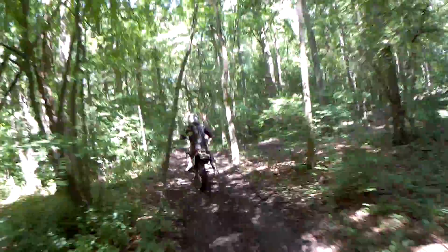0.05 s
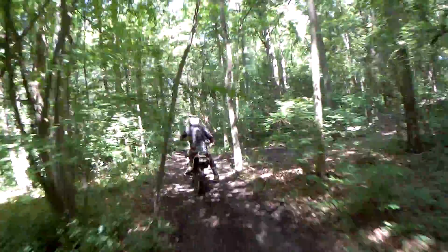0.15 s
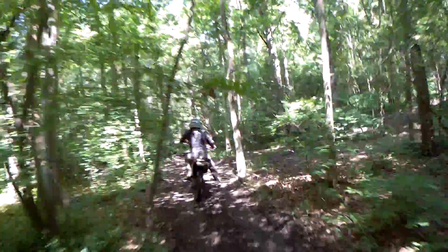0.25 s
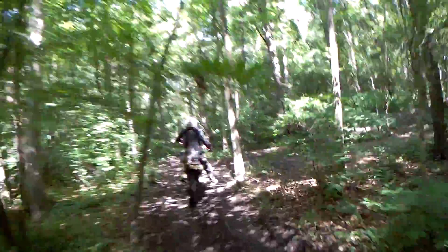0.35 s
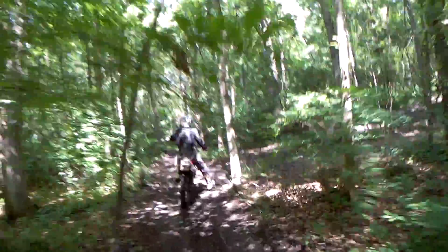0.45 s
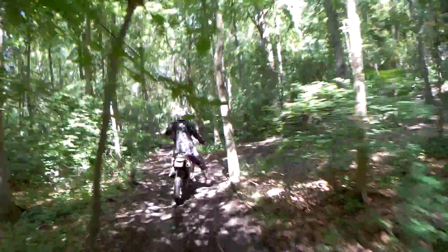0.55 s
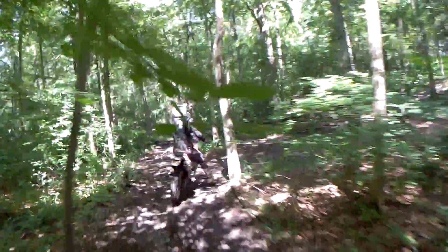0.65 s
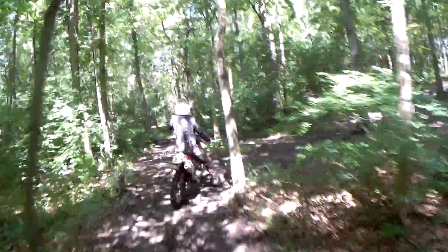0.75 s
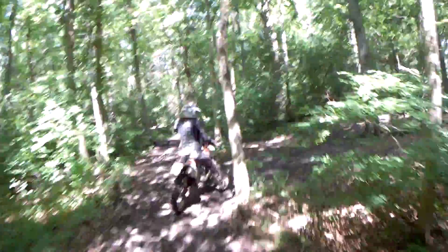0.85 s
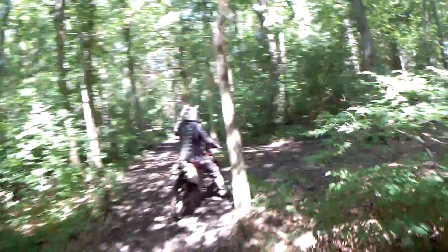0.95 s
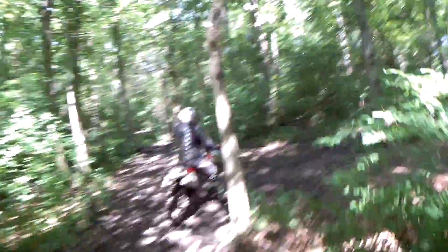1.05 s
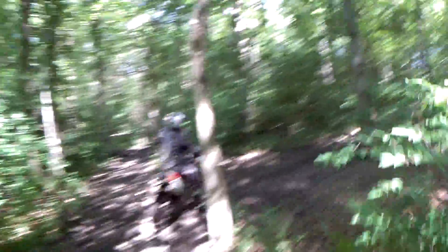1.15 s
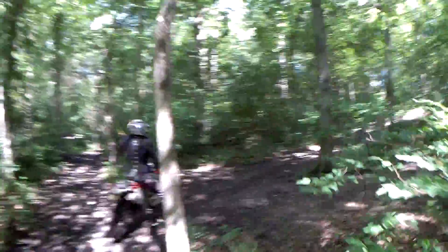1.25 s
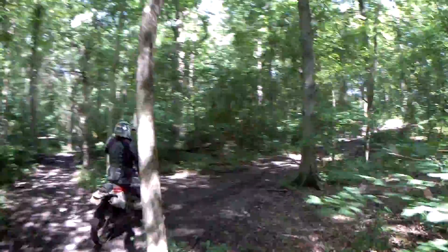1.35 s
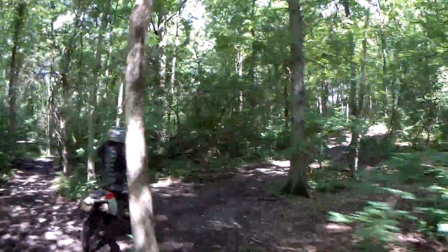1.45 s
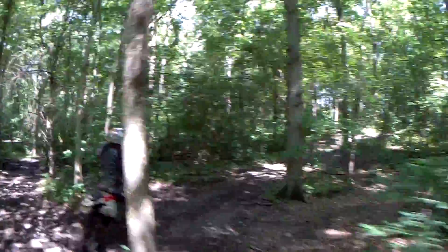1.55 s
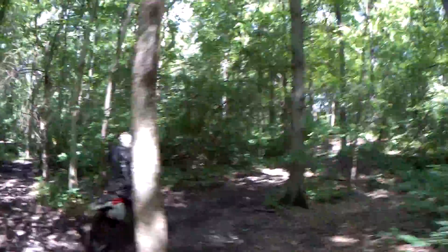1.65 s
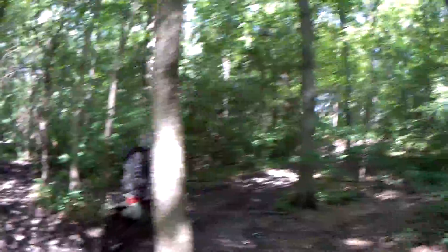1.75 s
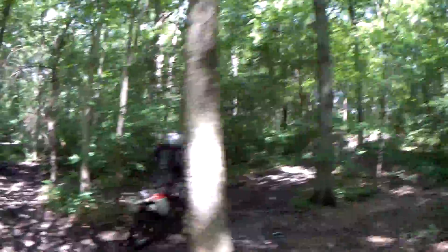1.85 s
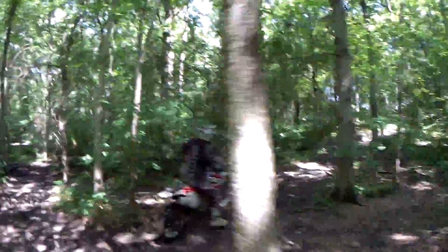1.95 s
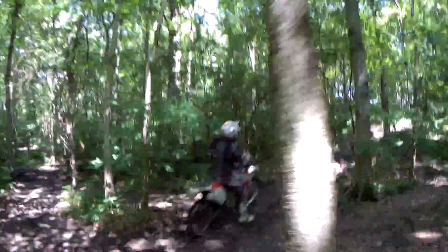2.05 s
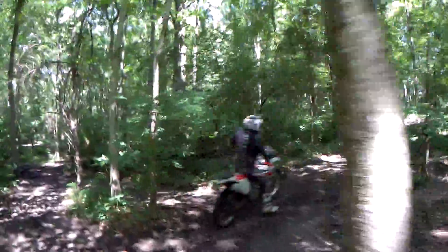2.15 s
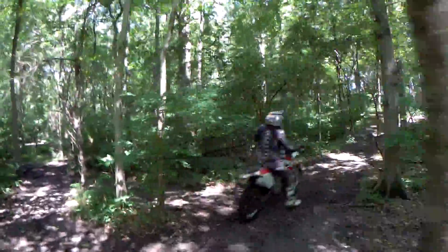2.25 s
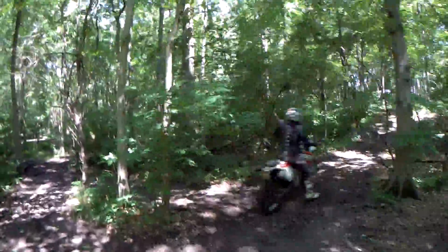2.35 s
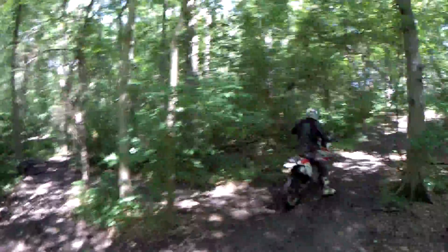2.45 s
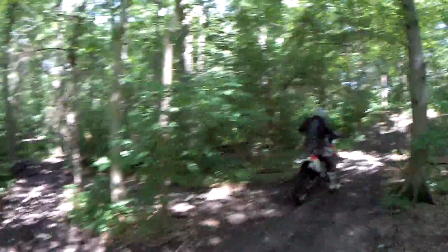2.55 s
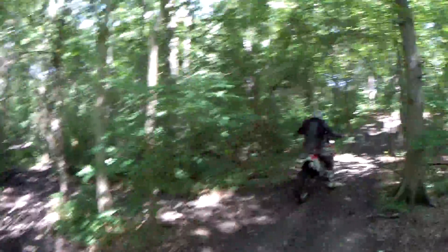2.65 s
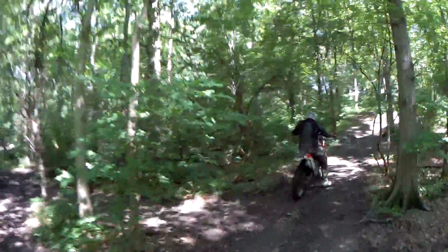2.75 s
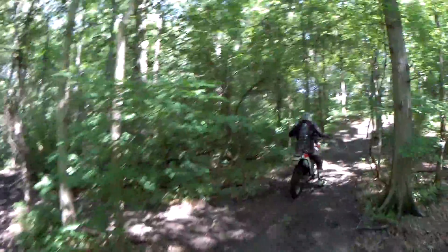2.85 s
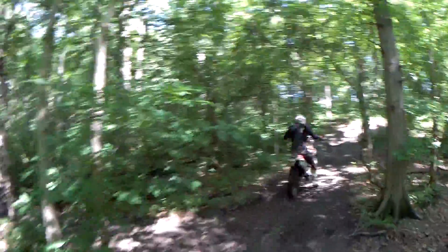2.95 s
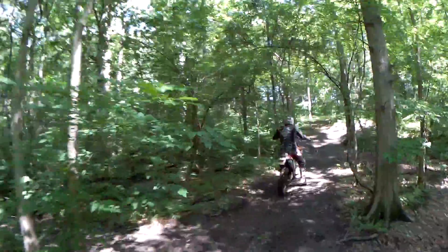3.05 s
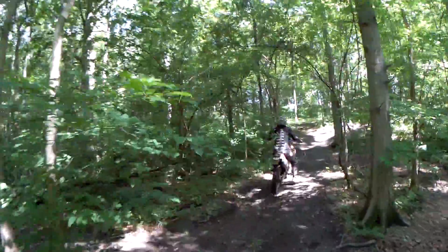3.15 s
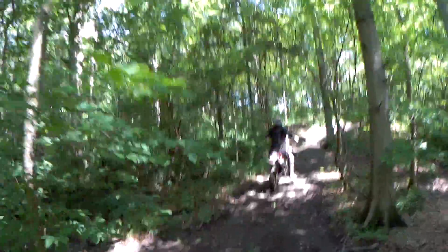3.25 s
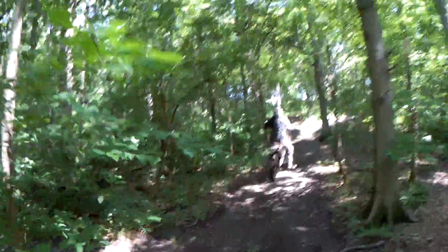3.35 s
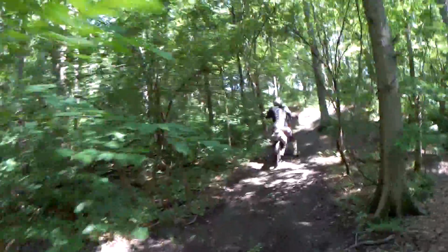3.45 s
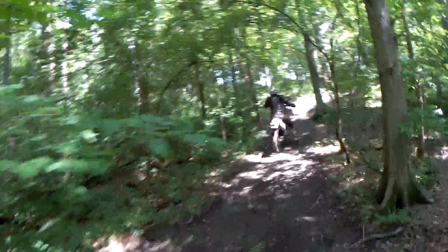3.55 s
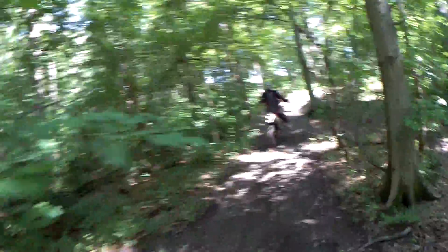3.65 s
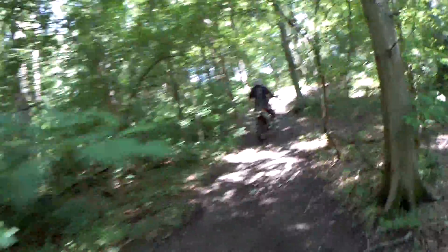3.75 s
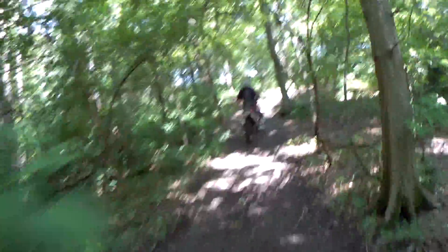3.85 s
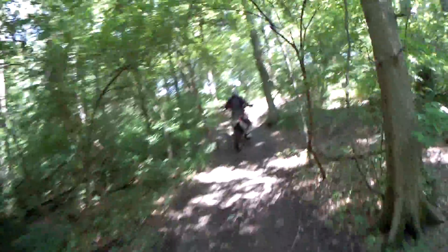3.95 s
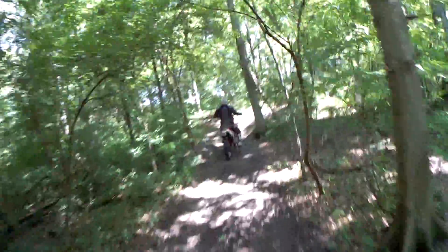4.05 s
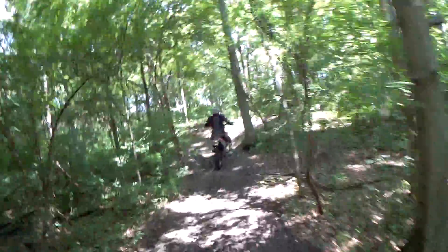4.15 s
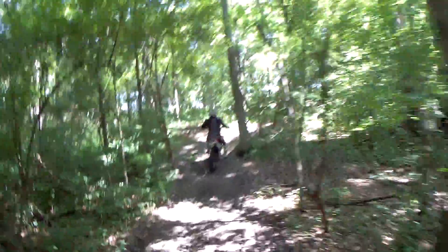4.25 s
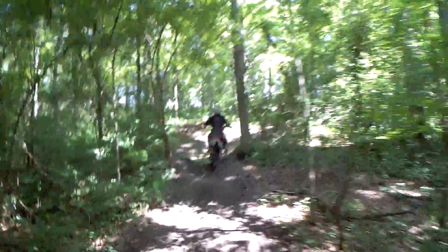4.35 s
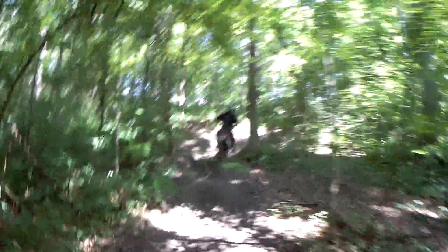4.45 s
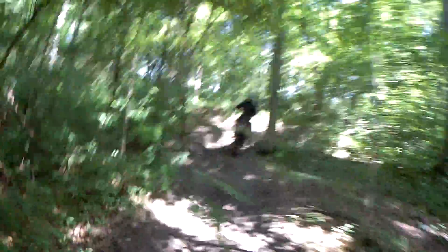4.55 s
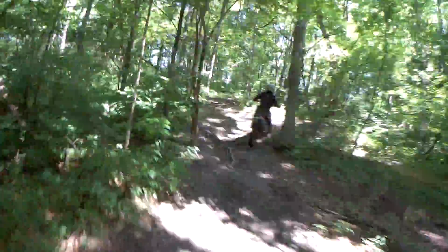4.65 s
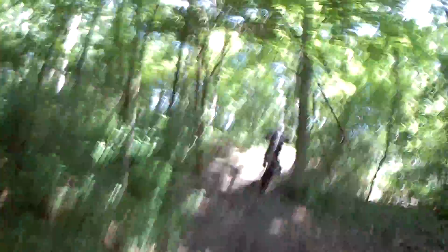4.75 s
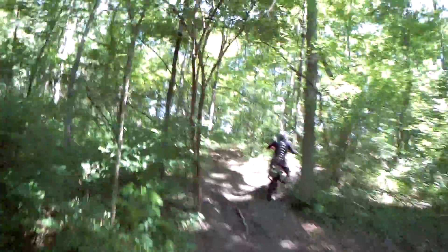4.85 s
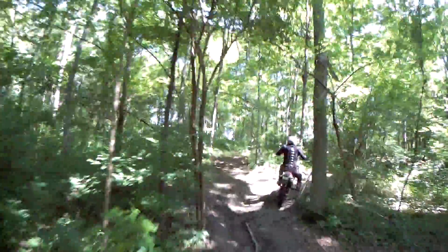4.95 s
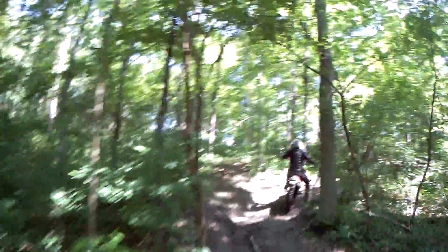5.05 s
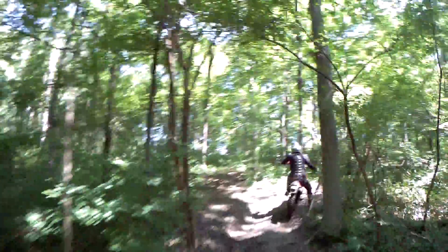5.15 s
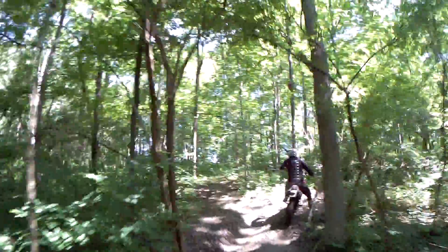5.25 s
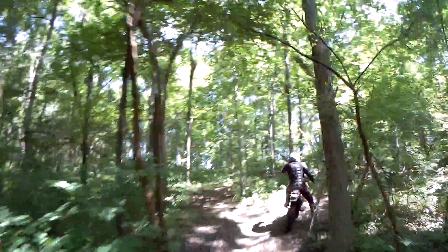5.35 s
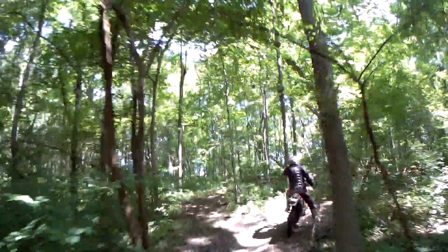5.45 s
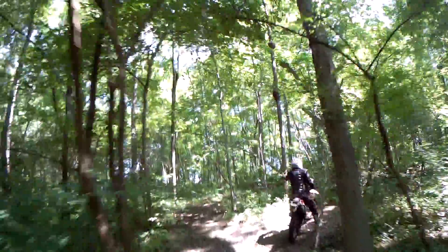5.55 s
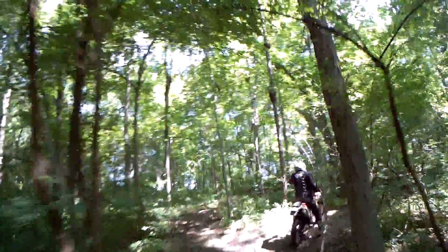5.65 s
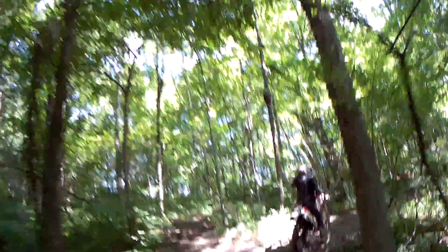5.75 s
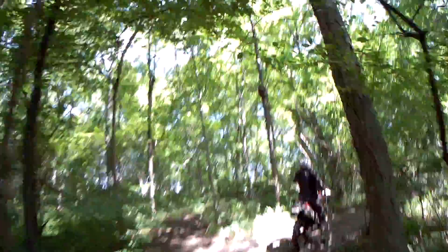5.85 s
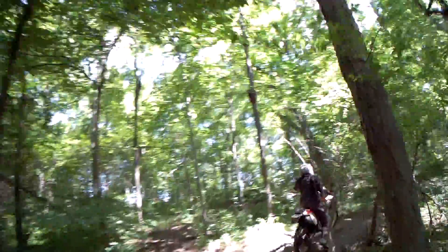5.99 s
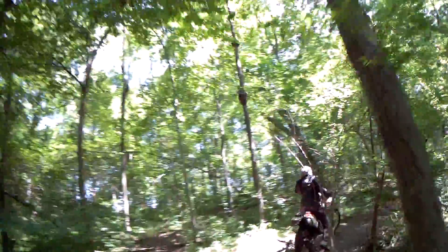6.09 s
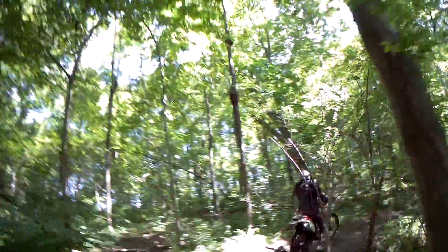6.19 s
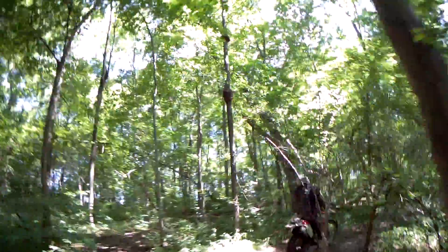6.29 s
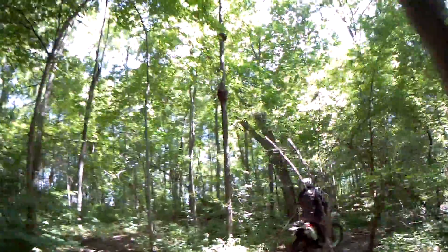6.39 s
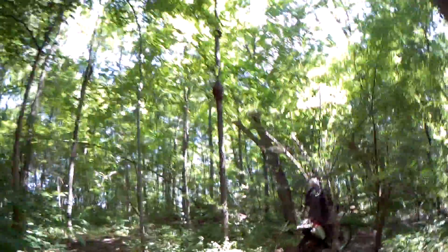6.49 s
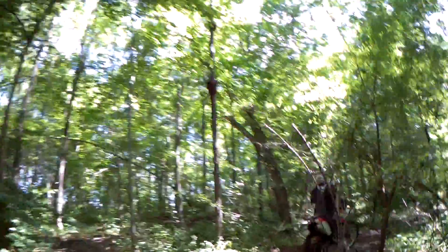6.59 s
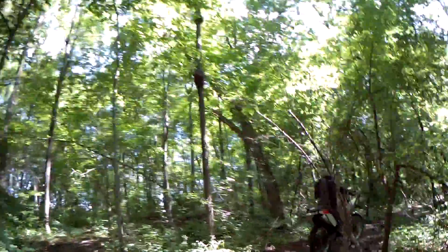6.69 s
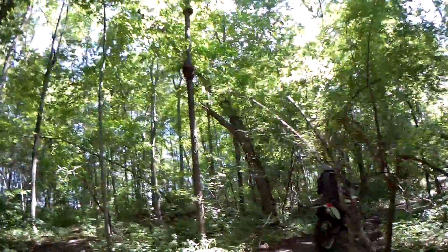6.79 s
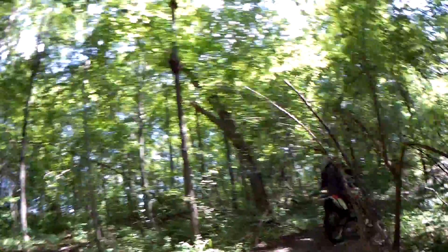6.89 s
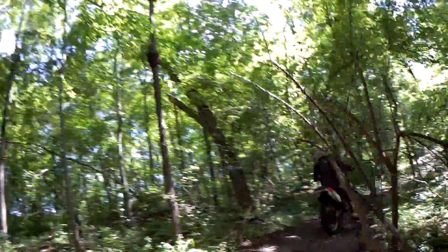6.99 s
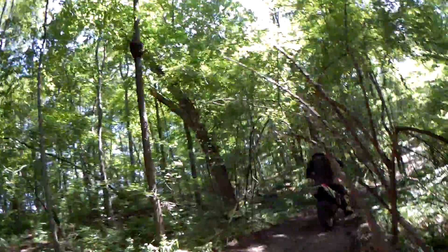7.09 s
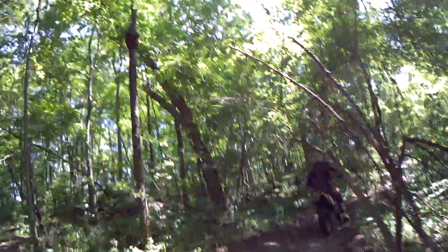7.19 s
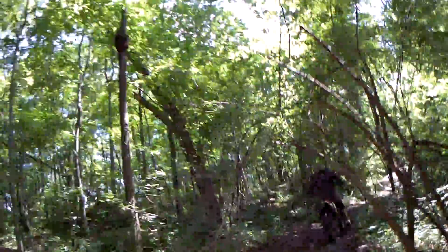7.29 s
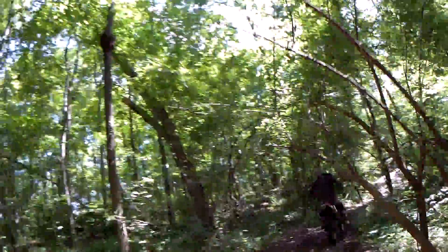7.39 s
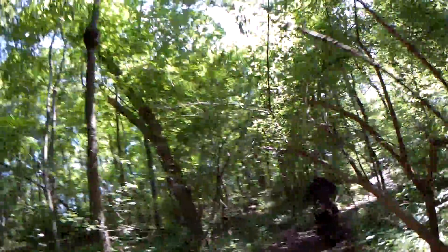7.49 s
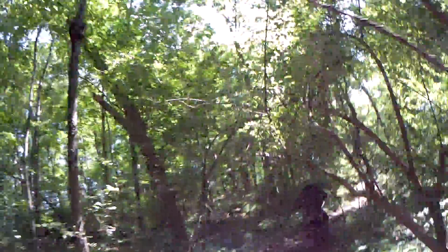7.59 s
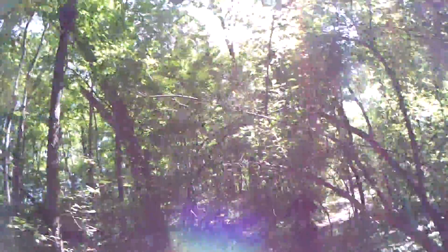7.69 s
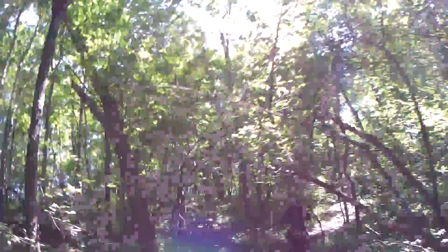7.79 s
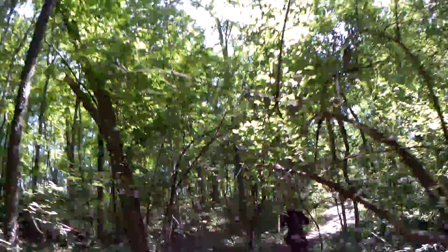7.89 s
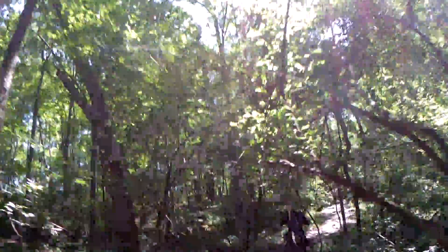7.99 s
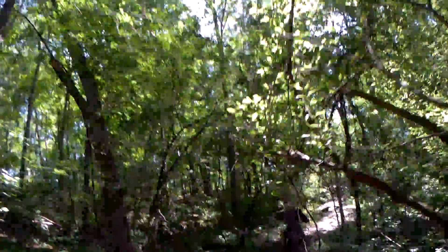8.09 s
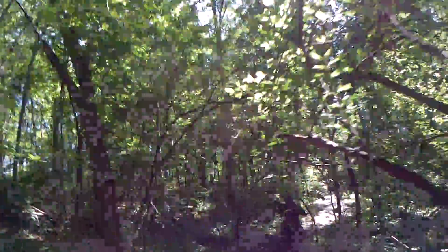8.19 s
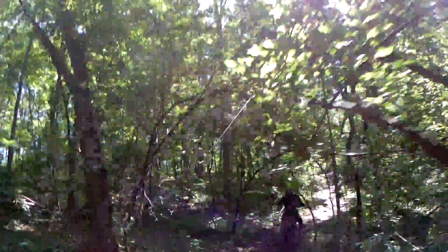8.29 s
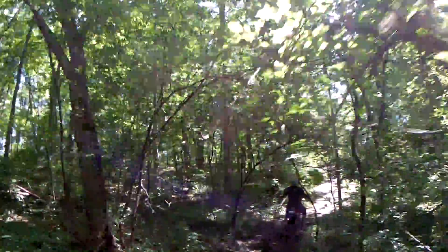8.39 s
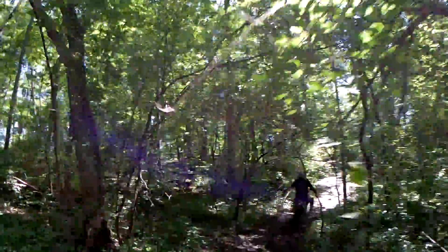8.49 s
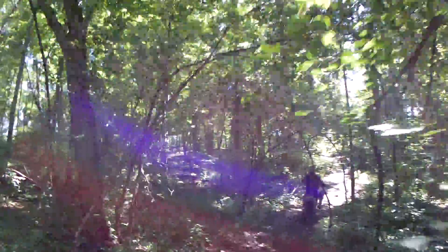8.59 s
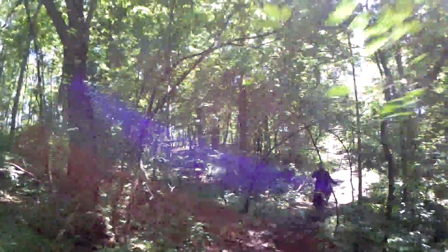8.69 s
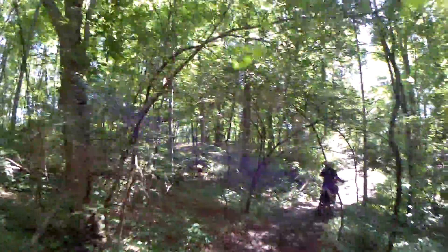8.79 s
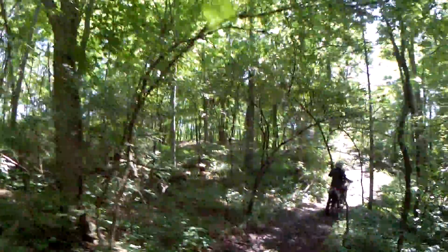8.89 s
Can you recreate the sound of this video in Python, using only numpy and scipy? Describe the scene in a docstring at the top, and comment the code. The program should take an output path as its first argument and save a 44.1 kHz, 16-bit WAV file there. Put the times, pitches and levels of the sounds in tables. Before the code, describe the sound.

Two single-cylinder dirt bikes rev in overlapping turns on a woodland trail, with rattling clatter, branch lashes and hard bumps against a helmet microphone.

```python
"""A woodland trail, heard by a small microphone shut in a case on the helmet of a dirt-bike rider.
The rider's single-cylinder engine and one ahead rev in turns that overlap: pulses ring their exhaust pipes.
Between revs the rider's engine ticks over. Clatter rings the case near 1.2 kHz, over a drone and lumpy wind.
Branches whip the case as bursts of noise and overload the input; bumps strike low tones in the mount."""
import sys
import numpy as np
from scipy import signal
from scipy.fft import rfft, irfft, next_fast_len
from scipy.io import wavfile

SR = 44100
rng = np.random.default_rng(int(sys.argv[2]) if len(sys.argv) > 2 else 0)


def wrap_up_sound(samples):
    """Save the sound to the file named by the first command line argument, as 16-bit audio."""
    columns = np.atleast_2d(samples).T
    # keep every value between -1 and 1, then stretch to whole-number steps
    tamed = np.clip(columns, -1, 1)
    steps = np.round(tamed * 32767).astype(np.int16)
    wavfile.write(sys.argv[1], SR, steps)


def boost(x):
    """Linear amplitude factor 10**(x/20) for a level x in decibels (scalar or array-like)."""
    u = np.asarray(x, float) / 20
    return 10 ** u


N = 393813  # length [samples]


def rms_one(x):
    """Scale a sound to an rms of one."""
    return x / np.sqrt(np.mean(x ** 2) + 1e-20)


def in_time(rows):
    """Join the points of a table with straight lines: one value a sample for each column."""
    s, *columns = np.transpose(rows)
    return [np.interp(np.arange(N) / SR, s, column) for column in columns]


def drift(rate_hz):
    """Slow random wander of spread 1: noise smoothed above rate_hz, made at every 40th sample."""
    r = np.exp(-2 * np.pi * rate_hz * 40 / SR)
    noise = rng.standard_normal(N // 40 + 2002)
    slow = signal.lfilter([1], [1, -2 * r, r * r], noise)[2000:]  # drop the filter's start
    return np.interp(np.arange(N) / 40, np.arange(len(slow)), rms_one(slow))


def resonator(hz, width_hz):
    """Filter coefficients of one resonance: a narrower one rings longer."""
    r = np.exp(-np.pi * width_hz / SR)
    return [(1 - r * r) / 2, 0, (r * r - 1) / 2], [1, -2 * r * np.cos(2 * np.pi * hz / SR), r * r]


def resonate(x, modes):
    """Resonances side by side, added with alternating signs."""
    out = 0
    for k, (hz, width_hz, db) in enumerate(modes):
        b, a = resonator(hz, width_hz)
        out = out + (-1) ** k * boost(db) * signal.lfilter(b, a, x + 1e-18)
    return out


def glide(x, hz, width_hz):
    """A resonance whose centre moves, stepped in short blocks."""
    out, state = np.zeros(N), np.zeros(2)
    for i in range(0, N, 256):
        b, a = resonator(hz[i], width_hz)
        out[i:i + 256], state = signal.lfilter(b, a, x[i:i + 256], zi=state)
    return out


def low_pass(x, hz):
    """Two-pole low-pass: softens what lies above hz."""
    return signal.sosfilt(signal.butter(2, hz, fs=SR, output="sos"), x)


def smear(x, lags_s, gain):
    """All-pass echoes in silencer and frame spread each pulse over its cycle."""
    size = next_fast_len(N + SR // 2)
    spectrum, hz = rfft(x, size), np.arange(size // 2 + 1) * SR / size
    for lag in lags_s:
        z = np.exp(-2j * np.pi * hz * lag)
        spectrum = spectrum * (z - gain) / (1 - gain * z)
    return irfft(spectrum, size)[:N]


def count_cycles(firing_hz, bursts, fires_at, jitter):
    """Add up the firing rate into a slightly uneven cycle count; each firing is a whole number."""
    cycles = np.cumsum(firing_hz) / SR + jitter * drift(10)
    # shift each burst so that one firing falls at its given time
    lead = -cycles[(np.array(fires_at) * SR).astype(int)] % 1 + np.arange(len(bursts))
    burst_ends = [burst[-1][0] + .3 for burst in bursts[:-1]]
    return cycles + lead[np.searchsorted(burst_ends, np.arange(N) / SR)]


def exhaust(pulses, firing_hz, pipe, header, boom, bark):
    """Pulses ring fixed pipe resonances, and a header and a boom that rise with engine speed."""
    spread = smear(pulses, [.0011, .0029], gain=.4)
    base_hz, climb, top_hz, boom_width, boom_db = boom
    keep = np.exp(-1 / (.1 * SR))  # the gas cools over about 0.1 s, so the boom sinks later than the speed
    lagging = signal.lfilter([1 - keep], [1, -keep], firing_hz)
    # hotter, faster gas lifts the main boom
    boom_hz = np.minimum(base_hz + climb * np.maximum(firing_hz, lagging), top_hz)
    # two coupled chambers: the boom swells and outlasts the cycle
    first_chamber = glide(smear(pulses, [.0071, .0127], gain=.5), boom_hz, boom_width)
    boom_ring = glide(first_chamber, boom_hz, boom_width)
    header_base, header_climb, header_width, header_db = header
    header_ring = boost(header_db) * glide(spread, header_base + header_climb * firing_hz, header_width)
    db_per_hz, even_hz = bark
    upper = (resonate(spread, pipe) - header_ring) * boost(db_per_hz * (firing_hz - even_hz))
    return rms_one(upper - boost(boom_db) * boom_ring)


def engine(speeds, bursts, pipe, header, boom, bark, fires_at, jitter, uneven_db):
    """One pressure pulse a firing into the exhaust; also a dying puff a firing, the level and cycle count."""
    firing_hz, = in_time(np.vstack(speeds))
    level_db, = in_time(np.vstack(bursts))
    t = np.arange(N) / SR
    # each burst fades in over 0.15 s before its first point and out over 0.15 s after its last
    on = sum(np.clip(np.minimum(t - b[0][0], b[-1][0] - t) / .15 + 1, 0, 1) for b in bursts)
    level = on * boost(level_db)
    cycles = count_cycles(firing_hz, bursts, fires_at, jitter)
    fired = np.diff(np.floor(np.maximum.accumulate(cycles)), prepend=N) > 0
    strength = boost(uneven_db * rng.standard_normal(N)) * np.sqrt(SR / firing_hz)  # same power at any speed
    pulses = low_pass(fired * strength, 1500)
    tone = exhaust(pulses, firing_hz, pipe, header, boom, bark)
    r = np.exp(-1 / (.012 * SR))  # a puff dies away with a 12 ms time constant
    puff = signal.lfilter([1], [1, -r], fired * boost(1.0 * rng.standard_normal(N)))
    puff *= np.minimum(25 / firing_hz, 1.5) ** 2.2  # slow strokes throb harder
    return tone * level, puff, level, cycles


# The rider's engine speed, one list a burst of throttle: (time [s], firing rate [Hz])
OWN_SPEED = [
    [(0, 30.4), (.3, 26.2), (.5, 21.5)],
    [(3.3, 16.4), (3.52, 28.6), (3.62, 31.8), (3.73, 30), (3.81, 23.9), (4.02, 20.5), (4.14, 23),
     (4.37, 28.1), (4.52, 26.9), (4.72, 30)],
    [(6.6, 18.6), (6.75, 22.9), (6.96, 25.8), (7.25, 31.4), (7.43, 32.9), (7.65, 34.2), (7.9, 34.1),
     (8.24, 33.1), (8.58, 34.1), (8.85, 33.8)],
]
# Its exhaust level in each burst: (time [s], level [dB])
OWN_LEVEL = [
    [(0, -24.5), (.3, -25.5), (.38, -75), (.5, -33)],
    [(3.3, -33.5), (3.46, -25), (3.75, -21), (3.9, -24), (4.38, -21.5), (4.52, -23), (4.72, -23.5)],
    [(6.6, -30), (6.9, -26.5), (7.25, -22.5), (7.5, -26), (8.2, -24.5), (8.85, -23.5)],
]
# Its exhaust resonances as they reach the microphone: (centre [Hz], width [Hz], level [dB])
OWN_PIPE = [(161, 47, -2.5), (237, 13, -0.5), (487, 14.7, 5.5), (495, 31, -0.5), (639.5, 28, -3),
            (749, 38, -8), (863, 40, -11.5), (1080, 37, -16), (1270, 90, -22)]
# Header resonance that slides up with speed: (base [Hz], rise [Hz per firing Hz], width [Hz], level [dB])
OWN_HEADER = (60, 14.3, 60, -2)
# Main boom of the pipe: (base [Hz], rise [Hz per firing Hz], highest [Hz], width [Hz], level [dB])
OWN_BOOM = (128, 6.5, 322, 36, 7)
# Upper resonances grow with speed: (growth [dB per firing Hz], firing rate where the change is none [Hz])
OWN_BARK = (0.026, 96)
# Time of one firing in each burst: (time [s])
OWN_FIRES = [.058, 4.161, 7.537]


def own_engine():
    """The rider's own engine under throttle: fairly even pulses ring its pipe."""
    return engine(OWN_SPEED, OWN_LEVEL, OWN_PIPE, OWN_HEADER, OWN_BOOM, OWN_BARK,
                  fires_at=OWN_FIRES, jitter=.002, uneven_db=.8)


# Tones locked to the rider's engine: (multiple of the firing rate)
WHINE_ORDERS = [2, 22, 32, 33, 35, 36, 38, 46, 47]
# Their strengths before the growth with speed: (level against the exhaust [dB])
WHINE_DB = [-12, -14, -10, -8, -4, -1, -10, -14, -13]


def whine(cycles, level):
    """Crank beat and gear whine of the rider's engine: sine tones that grow steeply with speed."""
    firing_hz, = in_time(np.vstack(OWN_SPEED))
    tones = sum(boost(db) * np.sin(2 * np.pi * k * cycles) for k, db in zip(WHINE_ORDERS, WHINE_DB))
    growth_db = np.minimum(2.0 * (firing_hz - 33), 1)  # 2 dB for each firing Hz, up to 1 dB
    return tones * level * boost(growth_db + 1.5 * drift(4.4))


# The rider's engine ticking over, one list a spell: (time [s], firing rate [Hz])
IDLE_SPEED = [
    [(1.9, 15), (2.65, 15.1), (2.88, 14.7), (3.0, 11.8), (3.24, 11.3), (3.3, 16)],
    [(5.15, 18.5), (5.95, 18.4), (6.1, 17.6), (6.55, 17.4), (6.6, 17)],
]
# Its exhaust level in each spell: (time [s], level [dB])
IDLE_LEVEL = [
    [(1.9, -40), (2.3, -36.5), (2.7, -38), (3.2, -35)],
    [(5.2, -44.5), (5.6, -36), (6.2, -40), (6.55, -34)],
]
# Its pipe resonances: (centre [Hz], width [Hz], level [dB])
IDLE_PIPE = [(476, 106, 0), (586, 145, -9.5), (830, 81, -13.5), (1200, 100, -9.5)]
# Its sliding header resonance: (base [Hz], rise [Hz per firing Hz], width [Hz], level [dB])
IDLE_HEADER = (400, 4.0, 80, -6)
# Its main boom: (base [Hz], rise [Hz per firing Hz], highest [Hz], width [Hz], level [dB])
IDLE_BOOM = (287, 1.47, 330, 47, 4.2)
# Time of one firing in each spell: (time [s])
IDLE_FIRES = [2.305, 5.592]


def idling_engine():
    """The rider's engine between bursts: slow pulses, more uneven in time and strength."""
    return engine(IDLE_SPEED, IDLE_LEVEL, IDLE_PIPE, IDLE_HEADER, IDLE_BOOM, (0, 0),
                  fires_at=IDLE_FIRES, jitter=.02, uneven_db=2)


# Speed of the engine ahead, one list a burst of throttle: (time [s], firing rate [Hz])
AHEAD_SPEED = [
    [(.3, 30.3), (.7, 30.5), (.98, 35), (1.3, 38.5), (1.42, 31.5), (1.55, 42.1), (1.7, 47.4), (1.8, 45.4),
     (1.96, 34.9), (2.21, 28.8), (2.55, 29.6), (2.7, 31.3), (2.83, 30.1), (3.16, 34.3), (3.35, 33.8)],
    [(5.7, 16.3), (5.81, 22.5), (5.98, 30.6), (6.12, 35.5), (6.5, 37.2), (6.9, 38.9), (7.0, 38.8),
     (7.12, 36), (7.5, 29.3), (7.75, 29.5), (8.0, 33.5), (8.2, 35), (8.45, 37.3), (8.9, 36.6)],
]
# Its exhaust level in each burst: (time [s], level [dB])
AHEAD_LEVEL = [
    [(.35, -35.5), (.7, -37), (.98, -32), (1.28, -32.5), (1.36, -43), (1.45, -29.5), (1.65, -33.5),
     (1.95, -31.5), (2.3, -31), (2.7, -30), (3.35, -33.5)],
    [(5.7, -38), (5.85, -30.5), (6.1, -30), (6.5, -29), (6.95, -27), (7.1, -33.5), (7.5, -29.5), (8.0, -30),
     (8.5, -36), (8.9, -33)],
]
# Its exhaust resonances as they reach the microphone: (centre [Hz], width [Hz], level [dB])
AHEAD_PIPE = [(300, 29, -4.5), (440, 34, 3), (586, 27, 1.5), (655, 40, -11.5), (900, 100, -12),
              (1280, 330, -10.5)]
# Its sliding header resonance: (base [Hz], rise [Hz per firing Hz], width [Hz], level [dB])
AHEAD_HEADER = (300, 3.4, 50, 0)
# Its main boom: (base [Hz], rise [Hz per firing Hz], highest [Hz], width [Hz], level [dB])
AHEAD_BOOM = (89, 2.02, 210, 79, 6.9)
# Its upper resonances: (growth [dB per firing Hz], firing rate where the change is none [Hz])
AHEAD_BARK = (0.71, 40)
# Time of one firing in each burst: (time [s])
AHEAD_FIRES = [1.684, 6.145]


def engine_ahead():
    """The engine of the bike ahead under throttle: the same kind of pulses ring another pipe."""
    return engine(AHEAD_SPEED, AHEAD_LEVEL, AHEAD_PIPE, AHEAD_HEADER, AHEAD_BOOM, AHEAD_BARK,
                  fires_at=AHEAD_FIRES, jitter=.002, uneven_db=.8)


# Tailpipe rasp of the rider's engine: (centre [Hz], width [Hz], level [dB])
OWN_RASP = [(1990, 170, -19), (2820, 230, 0.5), (3174, 160, 5), (4000, 350, -2), (6630, 600, -8)]
# Tailpipe rasp of the engine ahead: (centre [Hz], width [Hz], level [dB])
AHEAD_RASP = [(3140, 100, 6.5), (4340, 630, -2), (6730, 500, -6.5)]


def rasp(level, puff, modes, db):
    """Bright tailpipe rasp: noise puffing with the firings, set db against the exhaust."""
    noise = rng.standard_normal(N) * (1 + puff)
    return boost(db) * level * rms_one(resonate(resonate(noise, modes), [(3000, 9200, 0)]))


# Branches raking the case:
# (time [s], rattle length [s], rattle level before grip [dB], dull level [dB], dull swell length [s])
WHIPS = [(0.778, 0.0027, -26, -33, 0.00067), (.796, 0.041, 26, -3, 0.065), (4.742, 0.062, 4, 5.5, 0.047),
         (4.803, 0.05, 3, 14, 0.047), (4.862, 0.0087, -15, -7.5, 0.02), (4.979, 0.0053, -3, -5.5, 0.0013),
         (8.903, 0.001, -2.5, -25, 0.002), (8.907, 0.0087, -0.5, -7.5, 0.015), (8.925, 0.01, -8, -16, 0.01)]
# How the raked case rings: (centre [Hz], width [Hz], level [dB])
SHELL = [(650, 117, 0.5), (1178, 307, 0), (2620, 2150, -17), (4530, 1300, -16.5)]
# The dull part of a blow: (centre [Hz], width [Hz], level [dB])
DULL = [(42, 23, -0.75), (107, 48, -0.17), (314.7, 95, -1.1)]


def whips():
    """A sudden rattle that holds while the branch drags, with a duller shove that swells and then dies."""
    t = np.arange(N) / SR
    rattle, dull = np.zeros(N), np.zeros(N)
    for s, length, rattle_db, dull_db, dull_length in WHIPS:
        since = t - s
        rattle += (since > 0) * boost(rattle_db - 2200 * np.maximum(since - length, 0))  # falls 2200 dB/s
        swell = np.clip(since / dull_length, 0, 1) ** 0.39
        dull += swell * boost(dull_db - 1600 * np.maximum(since - dull_length, 0))
    noise = rng.standard_normal((2, N))
    grip = boost(3.7 * drift(83))  # the branch catches and slips
    shell_ring = rms_one(resonate(noise[0], SHELL))
    return rattle * grip * shell_ring + dull * rms_one(resonate(noise[1], DULL))


# Bumps through the mount: (time [s], strike [dB], extra for modes below 200 Hz [dB])
BUMPS = [(0.018, -12, -6.5), (0.849, -5, 3.5), (4.655, -12.5, -6), (4.808, 3, 5.5), (4.868, -10, -22),
         (4.889, 2.5, -9.5), (4.906, -13, 8.5), (4.986, -5, -3), (7.027, -18, -6), (7.272, -26, -1),
         (7.402, -31, 7), (7.98, -35, 8), (8.819, -20, -16), (8.833, -8, -20)]
# Tones of the mount: (pitch [Hz], level [dB], time to fall 60 dB [s])
MOUNT = [(24, -18, 0.86), (40.2, -15, 0.42), (94.7, -1, 0.27), (141, -4.5, 0.16), (310, -1, 0.082),
         (552, -5.5, 0.038)]


def bumps():
    """Each bump strikes every mount mode with a strength of its own, and the modes ring down."""
    s, strike_db, deep_db = np.transpose(BUMPS)
    at = (s * SR).astype(int)
    spread_db = rng.normal(0, 1.5, (len(BUMPS), len(MOUNT)))
    out = 0
    for k, (hz, db, t60) in enumerate(MOUNT):
        clicks = np.zeros(N)
        clicks[at] = boost(strike_db + db + deep_db * (hz < 200) + spread_db[:, k])
        r, w = boost(-60 / (t60 * SR)), 2 * np.pi * hz / SR
        out = out + signal.lfilter([0, np.sin(w)], [1, -2 * r * np.cos(w), r * r], clicks + 1e-18)
    return low_pass(out, 1300)


# A whirr, a short chirp, a rasp as the rider's engine pulls hard, and a rustle:
# (peak time [s], half length [s], peak level [dB], centre [Hz], width [Hz])
SWELLS = [(1.7, .3, -52, 4100, 300), (3.888, .006, -38, 4350, 300), (7.15, .22, -28, 1400, 250),
          (8.835, .012, -32, 2100, 500)]


def swells():
    """Bands of noise that rise and sink smoothly."""
    t, noise, out = np.arange(N) / SR, rng.standard_normal(N), 0
    for s, half_s, db, hz, width in SWELLS:
        band = resonate(resonate(noise, [(hz, width, 0)]), [(hz, 2 * width, 0)])
        out = out + boost(db) * np.exp(-((t - s) / half_s) ** 2) * rms_one(band)
    return out


# Engine clatter, which also steers the rattle and drone: (time [s], level [dB])
CLATTER_LEVEL = [(0, -22), (.4, -29.5), (1.3, -31), (1.7, -29.5), (3.2, -34), (3.5, -25), (4.7, -21.5),
                 (5.1, -30), (5.7, -36), (6.1, -29.5), (6.4, -30.5), (7.0, -24), (8.9, -24.5)]
# What the case lets through of the clatter: (centre [Hz], width [Hz], level [dB])
CASE = [(1044.4, 59, 1), (1245, 90, 8), (1604, 220, -5)]


def clatter(throb, clatter_db):
    """Engine clatter: flickering noise that throbs with the firings and rings the case."""
    noise = rng.standard_normal(N) * (1 + throb) * boost(1.5 * drift(6.8))
    ringing = low_pass(resonate(noise, CASE), 980)
    low_cut = signal.butter(4, 950, "high", fs=SR, output="sos")  # the case cuts the lows
    return boost(clatter_db) * rms_one(signal.sosfilt(low_cut, ringing))


# Metal rattle above the clatter: (centre [Hz], width [Hz], level [dB])
RATTLE = [(1882, 443, 3), (2501, 428, 3), (2770, 477, 2), (4970, 1280, -5.5), (6680, 2200, -9)]


def metal_rattle(throb, clatter_db):
    """Bright metal rattle: noise throbbing deeper with the firings, through resonances."""
    rattle = resonate(rng.standard_normal(N) * (1 + 2 * throb) * boost(1.0 * drift(7.2)), RATTLE)
    rattle = resonate(rattle, RATTLE)  # a second pass deepens the valleys
    rattle_db = -47.0 + 0.98 * (clatter_db + 29.5)  # the treble grows more slowly than the clatter
    return boost(rattle_db) * rms_one(rattle)


# Low drone under both engines: (centre [Hz], width [Hz], level [dB])
DRONE = [(172, 120, -6.5), (318, 23, 0), (436, 26, -1.5), (637, 162, -7.5), (840, 114, -4.5)]


def low_drone(clatter_db):
    """A low, fluttering drone of resonant noise that follows the clatter only slightly."""
    drone_db = -38 + .15 * (clatter_db + 30)
    return boost(drone_db) * rms_one(resonate(rng.standard_normal(N) * boost(1.3 * drift(29)), DRONE))


# Slow swell of the wind buffet on the microphone port: (time [s], level [dB])
WIND_LEVEL = [(0, -32), (.45, -36), (1.3, -39), (3.9, -41), (4.3, -52), (4.9, -32), (5.25, -42), (6.4, -39),
              (7.25, -35), (7.8, -39), (8.9, -39)]


def wind():
    """Lumpy wind on the port: low noise with slow gusts and quicker flutter."""
    wind_db, = in_time(WIND_LEVEL)
    lumps = boost(1.7 * drift(9.9) + 3 * drift(2.7))
    buffet = resonate(rng.standard_normal(N) * lumps, [(26.3, 12, 9), (63.6, 265, 2.6)])
    return boost(wind_db) * rms_one(low_pass(buffet, 300))


def scene():
    """Add up the engines, the blows on the case and the background."""
    own, own_puff, own_level, cycles = own_engine()
    ahead, ahead_puff, ahead_level, _ = engine_ahead()
    idle, idle_puff, idle_level, _ = idling_engine()
    # the louder engine counts most in the throb of clatter and rattle
    puffs = own_puff * own_level + ahead_puff * ahead_level + idle_puff * idle_level
    throb = 1.1 * puffs / (own_level + ahead_level + idle_level + .003)
    engines = own + ahead + idle + whine(cycles, own_level)
    engines = engines + rasp(own_level, own_puff, OWN_RASP, db=-24)
    engines = engines + rasp(ahead_level, ahead_puff, AHEAD_RASP, db=-23)
    clatter_db, = in_time(CLATTER_LEVEL)
    background = clatter(throb, clatter_db) + metal_rattle(throb, clatter_db) + low_drone(clatter_db) + wind()
    return (engines + whips() + bumps() + swells() + background)[None]


def band_limit(x):
    """A steep low-pass at the top of the band."""
    return signal.sosfilt(signal.butter(12, 15970, fs=SR, output="sos"), x)


def record(dry):
    """The input stage clips hard and adds its hiss; then the top is cut."""
    limit = 0.65  # largest level the input can pass
    clipped = limit * dry / (limit ** 8 + dry ** 8) ** (1 / 8)
    hiss = low_pass(boost(-56.5) * rng.standard_normal(dry.shape), 15400)
    top_cut = signal.cheby2(10, 50, 16100, fs=SR, output="sos")  # 50 dB down from 16.1 kHz
    mix = signal.sosfilt(top_cut, clipped + hiss)
    return band_limit(mix)


dry = scene()
out = record(dry)
wrap_up_sound(out)
```